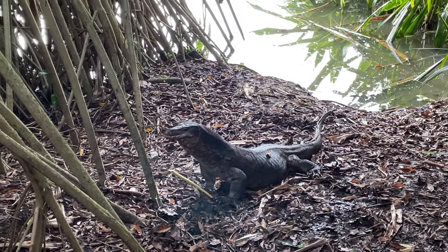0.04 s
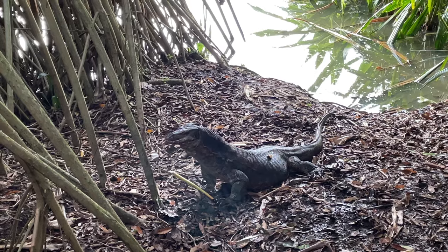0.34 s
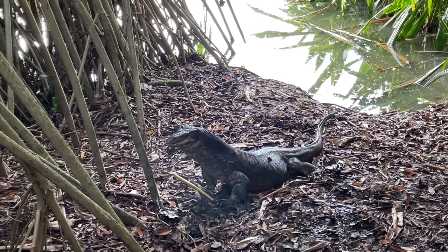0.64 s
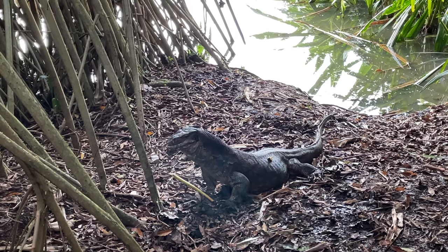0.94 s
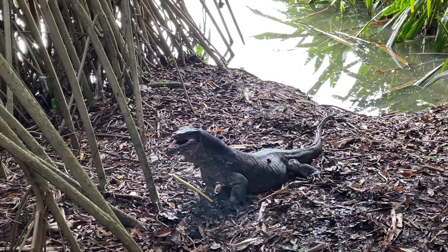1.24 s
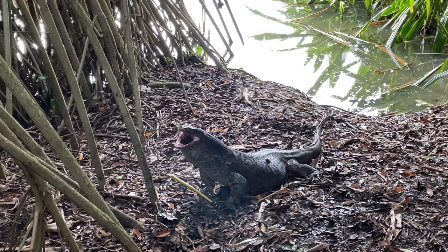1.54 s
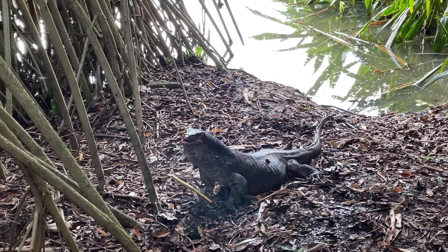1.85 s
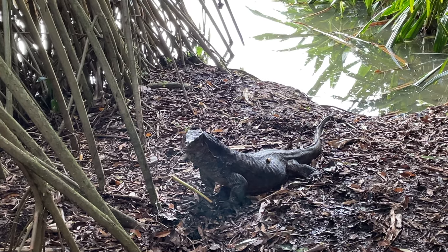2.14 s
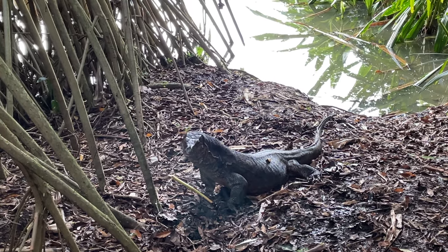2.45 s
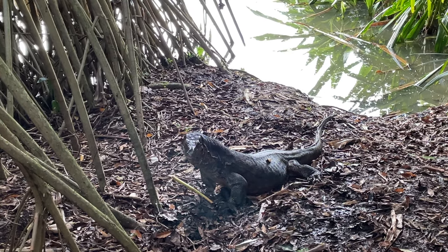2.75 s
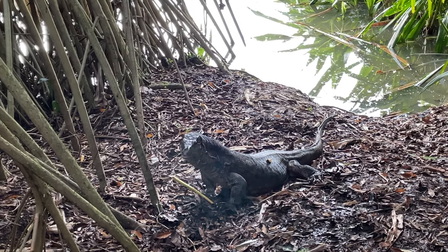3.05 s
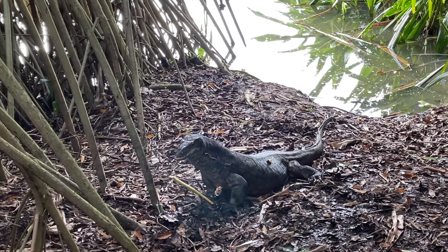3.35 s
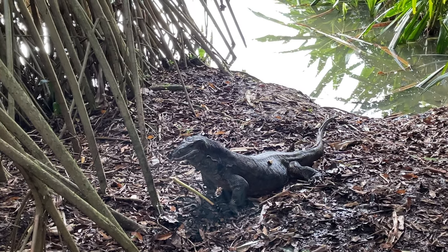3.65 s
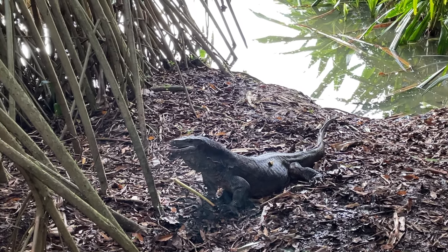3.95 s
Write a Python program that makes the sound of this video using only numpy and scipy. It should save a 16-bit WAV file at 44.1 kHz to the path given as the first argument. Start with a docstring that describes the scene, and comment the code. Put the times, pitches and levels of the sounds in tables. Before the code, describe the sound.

A nearby cicada buzzes throughout in trees by a pond, adding a shrill, slightly sagging whine at about 0.4, 1.6 and 2.8 seconds, each lasting under a second and ending in a stutter. Higher insects rasp in slow swells over distant traffic rumble and a faint machine hum. Small birds chirp far off, and dry leaves scuff softly around 1.2, 2.7 and 3.7 seconds.

```python
"""In the trees round a pond, insects sing over the low rumble of distant traffic and a machine hum.
A near cicada clicks its tymbals (drum-like skins on its body) so fast that they make a rough buzz,
and over this it repeats a whine that sags in pitch. Two higher insects rasp in slow swells.
Small birds chirp far off, faint calls come from the left, leaves hiss and dry ones shift."""
import sys
import numpy as np
from scipy import signal
from scipy.fft import rfft, irfft
from scipy.io import wavfile
from scipy.ndimage import uniform_filter1d

SR = 44100
rng = np.random.default_rng(int(sys.argv[2]) if len(sys.argv) > 2 else 0)


def unload_wav(signal):
    """Save mono or channel-first audio to the path in sys.argv[1] as 16-bit WAV at rate SR, clipped to [-1, 1]."""
    wavfile.write(
        sys.argv[1],
        SR,
        np.round(np.clip(np.atleast_2d(signal).T, -1, 1) * 32767).astype(np.int16),
    )


N = 176400

# the cicada's phrases (start [s], whine gain [dB])
PHRASES = [(0.409, -.5), (1.61, -0.5), (2.81, -0.5)]


def from_db(db):
    return 10 ** (np.asarray(db) / 20)


def normalise(x):
    """Scale a signal to an average power of 1."""
    return x / np.sqrt(np.mean(abs(x) ** 2))


def curve(at, rows, column=1):
    """Read between a table's rows along straight lines."""
    rows = np.array(rows, float)
    return np.interp(at, rows[:, 0], rows[:, column])


def wander(per_s):
    """A smooth random wobble of about 1 either way, with per_s new values a second."""
    hold = int(SR / per_s)
    steps = np.repeat(rng.standard_normal(N // hold + 1), hold)
    return 1.344 * uniform_filter1d(uniform_filter1d(steps, hold), hold)[:N]


def phase(hz):
    """The angle a vibration has turned through so far, in radians."""
    return 2 * np.pi * np.cumsum(hz) / SR


def flutter(width_hz):
    """A random flicker; multiplying a tone by it blurs the tone into a band of noise."""
    hz = np.fft.fftfreq(N, 1 / SR)
    noise = rng.standard_normal(N) + 1j * rng.standard_normal(N)
    return normalise(np.fft.ifft(noise / (1 + (2 * hz / width_hz) ** 2) ** 1.32))


def stereo(tone, lead):
    """Turn a complex tone into two channels, the left one ahead by lead radians."""
    return np.sqrt(2) * np.real(tone * np.exp(.5j * lead * np.array([[1], [-1]])))


def wide_noise(spectrum):
    """Stereo noise shaped by a table of frequencies and levels."""
    # how alike left and right are (frequency [Hz], likeness [0 to 1])
    likeness = [(30, 0.94), (70, 1), (125, 0.93), (250, 0.84), (500, 0.47), (1000, 0.22), (2000, 0.47),
                (4000, 1), (12000, 0.45)]
    log_hz = np.log(np.maximum(np.fft.rfftfreq(N, 1 / SR), 1))
    read = lambda rows: curve(log_hz, [(np.log(hz), value) for hz, value in rows])
    past_ends = abs(log_hz - np.clip(log_hz, np.log(spectrum[0][0]), np.log(spectrum[-1][0])))
    gain = from_db(read(spectrum) - 60 * past_ends)
    alike = np.clip(read(likeness), 0, .999)
    mid = irfft(rfft(rng.standard_normal(N)) * gain * np.sqrt(1 + alike), N)
    side = irfft(rfft(rng.standard_normal(N)) * gain * np.sqrt(1 - alike), N)
    return (mid + side * np.array([[1], [-1]])) / np.std(mid)


def traffic(t):
    """Distant traffic rumbles, and its bass swells and dips."""
    # the rumble's tone colour (frequency [Hz], relative level [dB])
    spectrum = [(13, -73), (22, -43.5), (46, -2), (67, 1), (289, -20.5), (329, -23), (368, -28),
                (412, -26.5), (505, -26), (555, -27), (1010, -32), (1310, -36.5), (1580, -34.5),
                (1700, -38), (1900, -57.5), (2470, -46), (4180, -120)]
    # the shape of the bass swells (time [s], relative level [dB])
    swells = [(0, -43), (.65, -47.5), (.74, -40), (.9, -53.5), (1.02, -40), (1.1, -40), (1.25, -46.5),
              (1.8, -43.5), (2.15, -48), (2.27, -39), (2.4, -44), (2.7, -48.5), (3.1, -44.5), (3.4, -43.5),
              (3.57, -52), (3.8, -40.5), (3.86, -49.5), (4, -40.5)]
    rumble = wide_noise(spectrum) * from_db(-44.4)
    bass = signal.sosfiltfilt(signal.butter(2, 140, fs=SR, output="sos"), rumble)
    swell_db = curve(t, swells)
    return rumble + bass * (from_db(.83 * (swell_db - swell_db.mean())) - 1)


def machine_hum():
    """Distant machinery hums, wavering in level and pitch."""
    # the hum's tones (pitch [Hz], level [dB])
    tones = [(62.4, -53.5), (372, -70.5), (497, -76.5)]
    return sum(from_db(db + 2 * wander(3.73)) * np.sqrt(2) * np.sin(phase(hz + 1.575 * wander(6)))
               for hz, db in tones)


def leaf_hiss():
    """Far-off leaves blend into a soft, nearly steady hiss."""
    # the hiss's tone colour (frequency [Hz], relative level [dB])
    spectrum = [(1500, 0), (1900, 2.5), (2700, -0.5), (3600, -7.5), (5000, -6), (6400, -5), (7300, -59.5),
                (8200, -3.5), (10000, 1), (11200, -8.5), (12600, 2.5), (13000, -18)]
    return wide_noise(spectrum) * from_db(-65.5 + .7 * wander(3.4))


def cicada_buzz(t):
    """Uneven tymbal beats keep the body ringing; the tone colour shifts during a phrase."""
    # how the body rings (pitch [Hz], width [Hz], level [dB], change in a phrase [dB], left lead [rad])
    resonances = [(3074, 163, -63, -0.5, 0.5), (6040, 354, -67, 0, 0), (11850, 160, -66, 6, -0.87),
                  (12100, 180, -66, -3, -1.1)]
    tymbal_hz, beat_depth, hold_s = 314, .45, .75
    in_phrase = sum(1. * ((t > start) & (t < start + hold_s)) for start, _ in PHRASES)
    effort = uniform_filter1d(in_phrase, SR // 12)
    beat = normalise(1 + beat_depth * np.cos(phase(tymbal_hz * (.985 + .04 * wander(120)))))
    out = 0
    for hz, width, db, change_db, lead in resonances:
        ringing = flutter(width) * beat * np.exp(2j * np.pi * hz * t)
        out += stereo(ringing * from_db(db + change_db * effort), lead)
    return out


def insect_rasps(t):
    """Fast pulses of a high ringing; each swell climbs in level and pitch, then falls back."""
    # one row per insect (end of a swell [s], swell spacing [s], pulse rate [Hz], pitch [Hz],
    # pitch rise scale [Hz], width [Hz], level [dB], swell scale [dB], left lead [rad])
    insects = [(1.422, 1.27, 78, 8898, 170, 560, -59, 4, 2.22),
               (1.732, 1.22, 81, 9486, 99.2, 427, -69, 7, 0.48)]
    release_s, sharpness = .17, .55
    out = 0
    for end, period, rate, hz, rise, width, db, swell_db, lead in insects:
        progress = (t - end) / period % 1
        effort = uniform_filter1d(np.sin(np.pi / 2 * progress), int(release_s * SR))
        pulse_hz = rate * (1 + .012 * wander(11.3))
        pulses = normalise(np.exp(sharpness * np.cos(phase(pulse_hz))))
        rasp = flutter(width) * pulses * np.exp(1j * phase(hz + rise * (effort - .5)))
        out += stereo(rasp * from_db(db + swell_db * (effort ** 2 - .5)), lead)
    return out


def bird_chirps(t):
    """Small birds give short, slightly rough whistles that rise, dip and rise again."""
    # the whistles (start [s], length [s], pitch at the dip [Hz], level [dB])
    chirps = [(0.228, 0.043, 2650, -66.5), (0.307, 0.059, 2230, -67), (0.38, .065, 2190, -59.5),
              (0.663, 0.048, 2265, -67), (1.112, .055, 2480, -68.5), (1.334, 0.05, 2200, -58.5),
              (1.489, .045, 2460, -66), (1.712, 0.05, 2470, -61), (1.77, .05, 1700, -72),
              (2.068, 0.035, 1697, -53), (2.437, 0.065, 2275, -62), (2.587, 0.035, 2450, -63),
              (2.594, 0.048, 1940, -62.5), (2.713, 0.051, 2534, -65), (2.763, 0.049, 2130, -67),
              (3.092, 0.052, 2200, -61.5), (3.274, 0.048, 2220, -65), (3.445, 0.061, 2250, -68),
              (3.731, 0.055, 2000, -62.5), (3.787, 0.067, 2300, -66.5)]
    # the shape of one whistle (progress [0 to 1], pitch [ratio], gain [dB])
    shape = [(0, 0.93, -10), (.24, 1.11, -7), (.45, 1.03, 2.5), (.64, 1, -4.5), (.82, 1.06, 2),
             (1, 1.27, -11)]
    out = np.zeros(N)
    for start, length, hz, db in chirps:
        progress = (t - start) / length
        on = (progress > 0) & (progress < 1)
        level = from_db(db + curve(progress[on], shape, column=2))
        out[on] += np.sqrt(2) * level * np.sin(phase(hz * curve(progress[on], shape)))
    return out * (1 + .25 * np.sqrt(2) * np.real(flutter(width_hz=250)))


def tree_echo(sound, t):
    """The trees scatter a sound back as a short echo that dies away."""
    fade_s, echo_db = .45, -4
    tail = rng.standard_normal((2, SR)) * from_db(-60 * t[:SR] / fade_s)
    tail /= np.sqrt(np.sum(tail ** 2) / 2)
    return sound + from_db(echo_db) * signal.fftconvolve(sound[None], tail, axes=1)[:, :N]


def cicada_whine(t):
    """A sagging tone that throbs with the tymbal beats and stutters at the end of each phrase."""
    # loudness at 1, 2 and 4 times the whine's pitch (time into the phrase [s], level [dB])
    first = [(-.02, -96), (.02, -64.5), (.1, -61.5), (.16, -64.5), (.26, -58), (.36, -66), (.41, -57.5),
             (.46, -68), (.53, -58.5), (.65, -70.5), (.85, -84)]
    second = [(-.02, -85), (.03, -63), (.12, -59), (.15, -64), (.19, -57.5), (.22, -64), (.26, -57),
              (.38, -66), (.42, -56), (.49, -51), (.53, -53.5), (.56, -59), (.595, -52), (.67, -68),
              (.72, -62), (.8, -68), (.88, -80)]
    fourth = [(-.03, -78), (.02, -58), (.08, -52), (.125, -52.5), (.15, -57), (.19, -48.5), (.23, -51),
              (.26, -63), (.29, -51.5), (.36, -52), (.4, -65), (.425, -50), (.5, -51), (.555, -63),
              (.59, -54), (.63, -53), (.665, -62), (.7, -55), (.78, -66), (.88, -80)]
    # (pitch multiple, levels, upper side tone [dB], lower side tone [dB], left lead [rad])
    harmonics = [(1, first, -70.5, -79, .5), (2, second, -72, -72, 0), (4, fourth, -64.5, -71, -.72)]
    whine_hz, sag_hz_per_s = 2979, 70
    tymbal_hz, slowing_hz_per_s = 314, 14
    stutter_at_s, stutter_ramp_s = .66, .12
    attack_s, release_at_s, release_s = .1, .5, .35
    roughness = 1 + from_db(-22) * flutter(width_hz=60)
    out = 0
    for start, db in PHRASES:
        age = np.clip(t - start, 0, 1)
        stutter = np.clip((age - stutter_at_s) / stutter_ramp_s, 0, 1)
        jitter = .0005 * wander(90) + .005 * stutter * wander(220)
        sag_hz = sag_hz_per_s * np.minimum(age, stutter_at_s + stutter_ramp_s / 2)
        angle = phase((whine_hz - sag_hz) * (1 + jitter))
        beat_hz = (tymbal_hz - slowing_hz_per_s * age) * (1 + .004 * wander(60))
        beat = np.exp(1j * phase(beat_hz))
        effort = np.clip(age / attack_s, 0, 1) * np.clip(1 - (age - release_at_s) / release_s, 0, 1)
        throb = effort * (beat + from_db(-13) * beat ** 2)
        sounding = uniform_filter1d(1. * ((t > start - .03) & (t < start + .95)), SR // 25)
        for multiple, levels, upper_db, lower_db, lead in harmonics:
            flicker_db = (1 + 2.5 * stutter) * wander(50)
            centre = sounding * from_db(curve(t - start, levels) + flicker_db)
            # the throb adds side tones above and below, spaced by the beat rate
            sides = from_db(upper_db) * throb + from_db(lower_db) * np.conj(throb)
            sides *= np.exp(.5j * wander(50))
            tone = (centre + 1j * sides) * roughness * np.exp(1j * multiple * angle)
            out += stereo(tone * from_db(db), lead)
    return out


def scratchy_birds(t):
    """Scratchy bird calls: each is a band of noise that slides down in pitch."""
    # the calls (start [s], length [s], first pitch [Hz], last pitch [Hz], level [dB])
    calls = [(.6, .06, 4000, 3600, -72), (1.44, .09, 4750, 4100, -71.5), (1.91, .08, 4800, 4250, -71.5),
             (2.93, .05, 3900, 3600, -73), (3.13, .06, 4000, 3500, -69.5), (3.21, .05, 4500, 4100, -73)]
    scratch = flutter(width_hz=700)
    out = np.zeros(N)
    for start, length, from_hz, to_hz, db in calls:
        progress = (t - start) / length
        on = (progress > 0) & (progress < 1)
        glide = np.exp(1j * phase(from_hz * (to_hz / from_hz) ** progress[on]))
        swell = np.sqrt(2 * np.sin(np.pi * progress[on]))
        out[on] += from_db(db) * swell * np.real(scratch[on] * glide)
    return out


def far_calls(t):
    """Faint, blurred calls swell and fade far away on the left."""
    # the calls (start [s], length [s], pitch [Hz], width [Hz], level before panning [dB])
    calls = [(0.69, .5, 1030, 100, -69.5), (0.61, 0.53, 1550, 880, -71), (1.74, 0.13, 1200, 310, -74),
             (3.63, 0.43, 1040, 33, -72), (3.56, 0.82, 1750, 1400, -67.5)]
    out = 0
    for start, length, hz, width, db in calls:
        progress = np.clip((t - start) / length, 0, 1)
        swell = np.sqrt(2 * abs(np.sin(np.pi * progress)))
        out += from_db(db) * swell * np.real(flutter(width) * np.exp(2j * np.pi * hz * t))
    return out * from_db([[4], [-4]])


def dry_leaves(t):
    """Dry leaves shift, making short, grainy scuffs of noise."""
    # the scuffs (peak time [s], rise [s], decay [s], centre pitch [Hz], level [dB])
    scuffs = [(1.19, 0.049, 0.19, 6900, -67), (2.695, .004, .012, 6000, -56),
              (2.703, .005, 0.013, 3580, -64), (3.66, 0.034, 0.087, 4300, -65),
              (3.721, 0.01, 0.0097, 4960, -59), (3.732, 0.0082, 0.017, 3450, -57),
              (3.885, .01, 0.022, 3870, -68)]
    band_ratio, grain_db = 1.5, 3.5
    out = 0
    for at, rise, decay, hz, db in scuffs:
        band = signal.butter(1, [hz / band_ratio, hz * band_ratio], "bandpass", fs=SR, output="sos")
        grains = rng.standard_normal(N) * from_db(grain_db * wander(900))
        envelope = np.exp(-np.maximum((at - t) / rise, (t - at) / decay))
        out += normalise(signal.sosfilt(band, grains)) * from_db(db) * envelope
    return out


def scene():
    """Add up all the sounds round the pond."""
    t = np.arange(N) / SR
    insects = cicada_whine(t) + cicada_buzz(t) + insect_rasps(t)
    birds = tree_echo(bird_chirps(t) + scratchy_birds(t), t)
    faint_sounds = dry_leaves(t) + far_calls(t)
    rumble = (traffic(t) + machine_hum()) * from_db([[-.5], [.5]])  # a little louder on the right
    return insects + birds + faint_sounds + rumble + leaf_hiss()


def record(dry):
    """Cut away the highest treble."""
    top_hz = 12850
    return signal.sosfilt(signal.ellip(10, .2, 80, top_hz, fs=SR, output="sos"), dry)


dry = scene()
out = record(dry)
unload_wav(out)
```